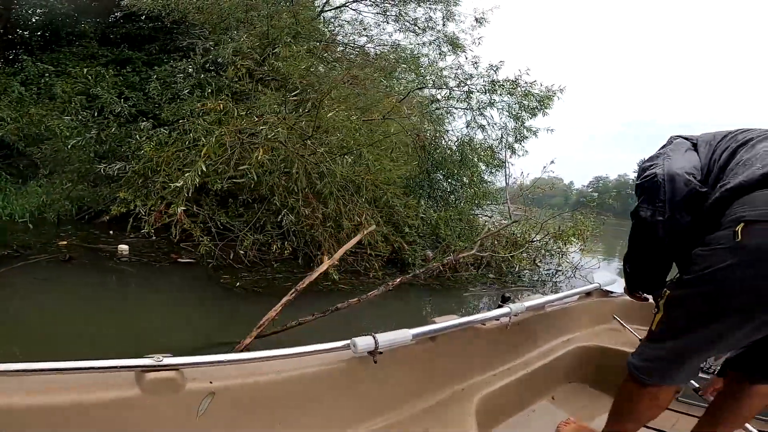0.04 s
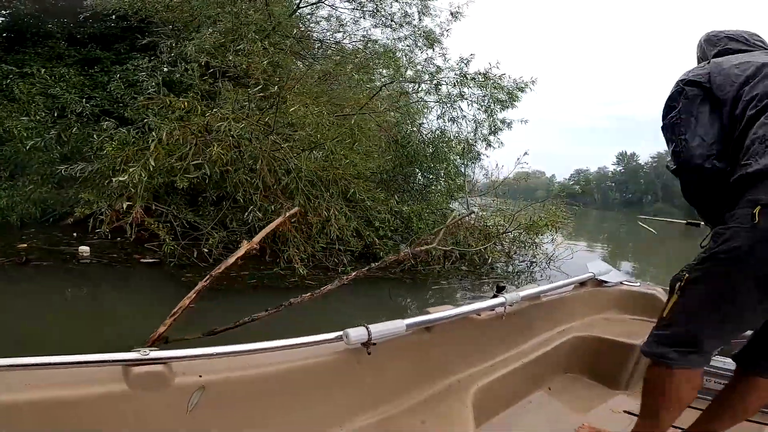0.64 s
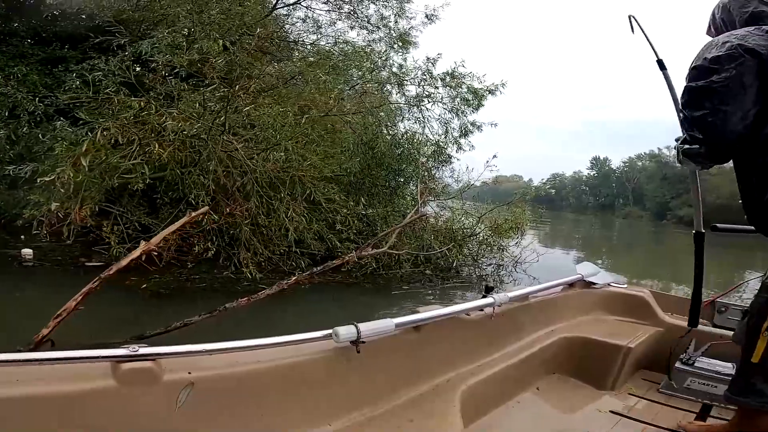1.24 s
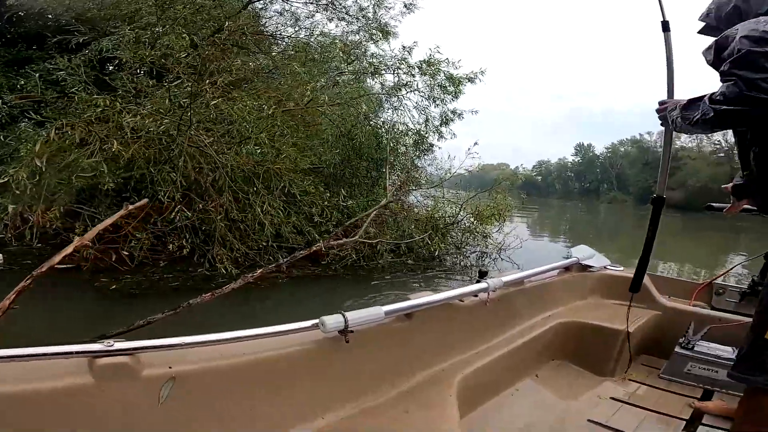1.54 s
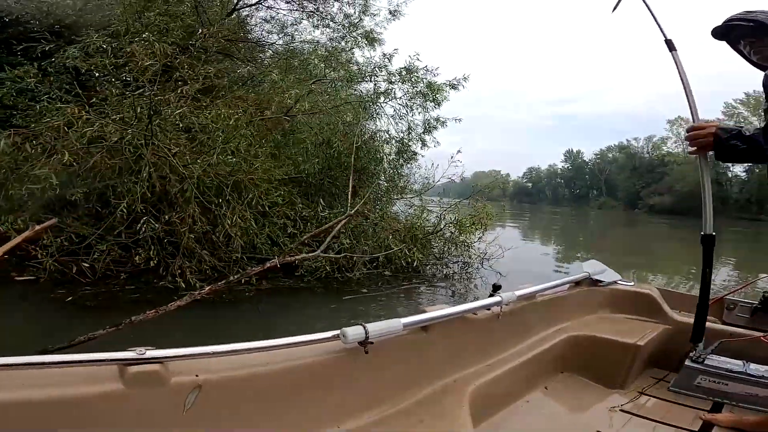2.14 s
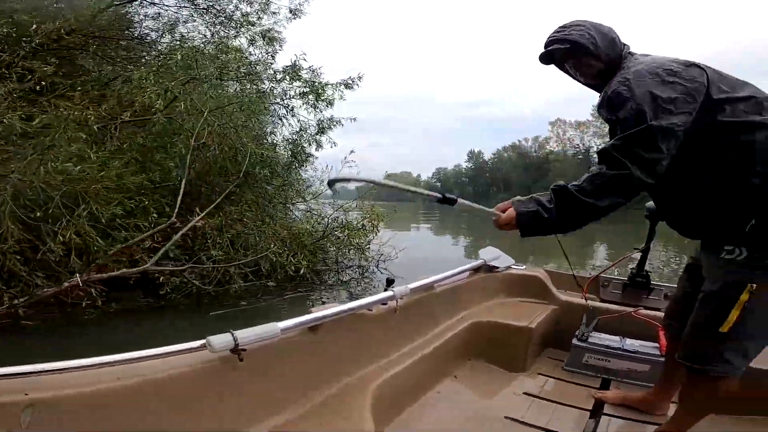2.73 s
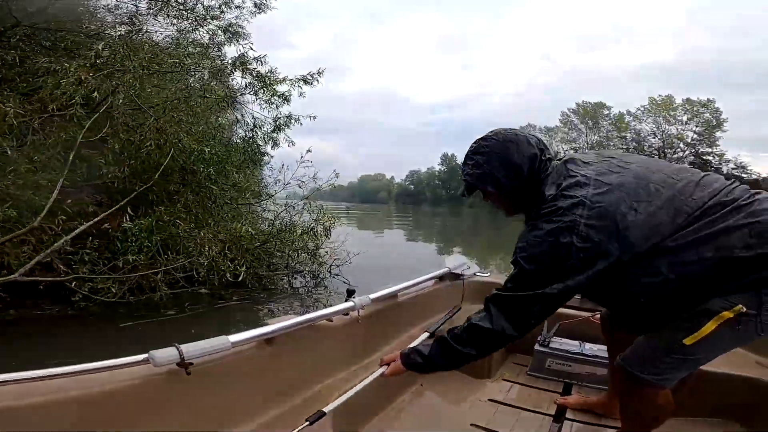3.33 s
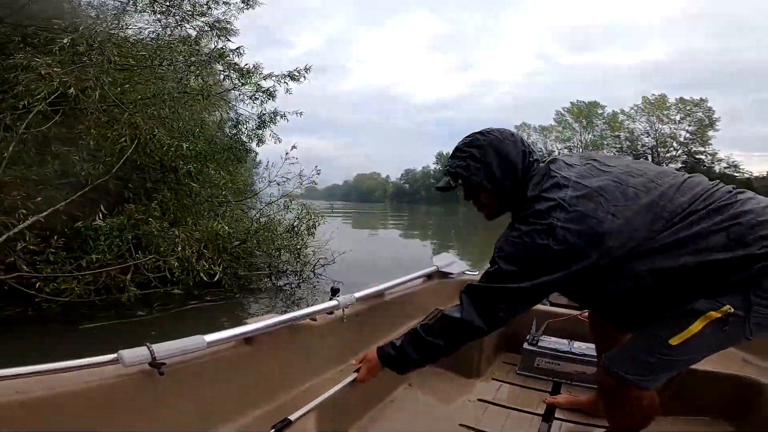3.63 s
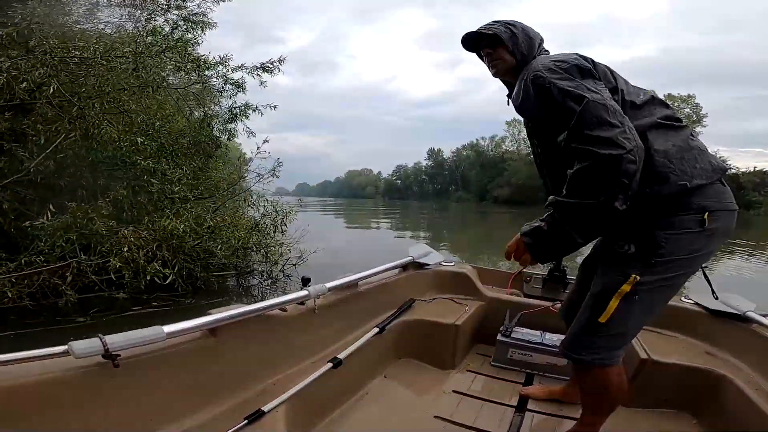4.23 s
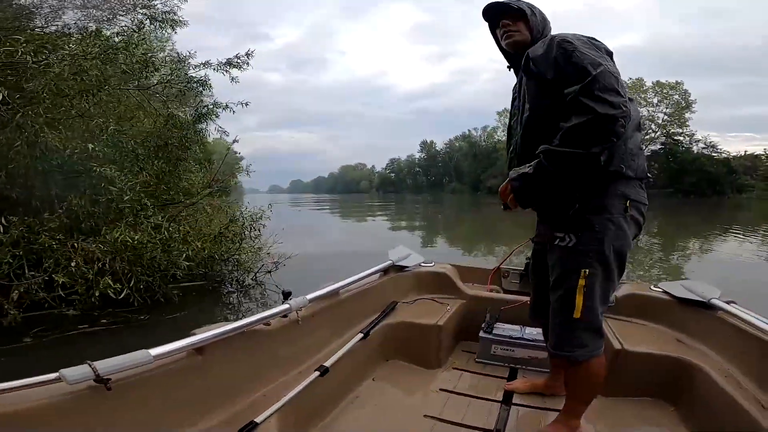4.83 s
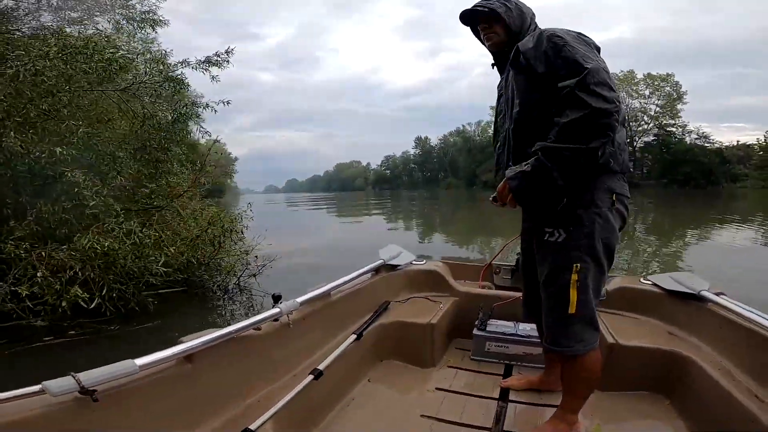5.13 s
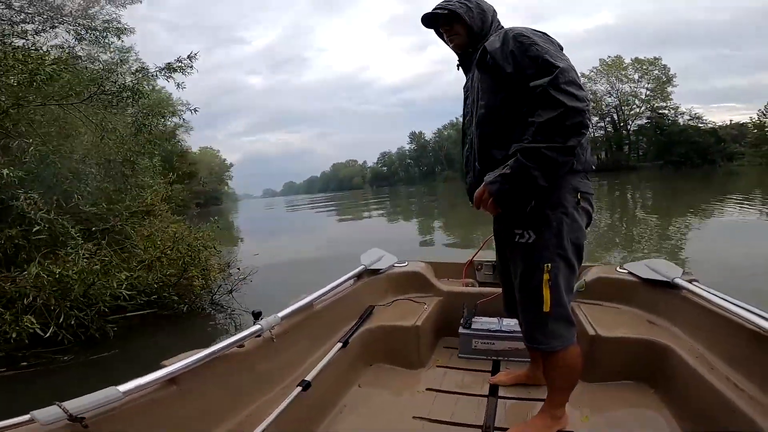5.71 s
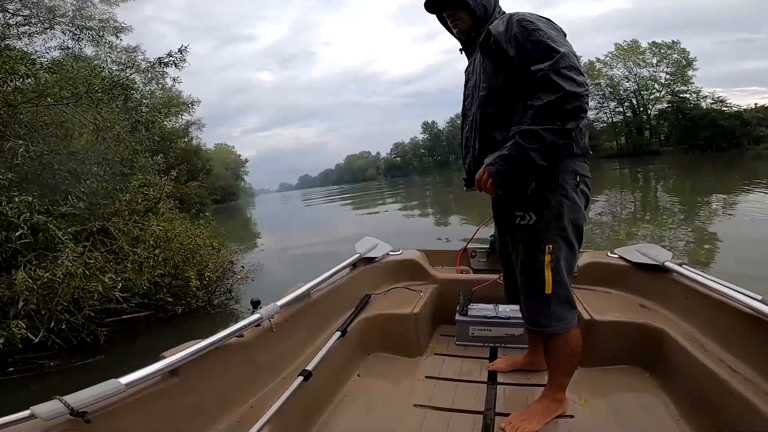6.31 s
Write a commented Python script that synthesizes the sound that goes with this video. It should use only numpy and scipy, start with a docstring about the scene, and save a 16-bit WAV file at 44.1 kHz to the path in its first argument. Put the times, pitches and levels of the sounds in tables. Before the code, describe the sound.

Gear booms, thumps and clatters on a hollow plastic boat hull, with small tackle clicks, jacket rustle and a low hum.

```python
"""Angler in a plastic boat

An angler in a rain jacket lays a long pole down in a small boat on a river and stands up again.
Gear booms, thumps and clatters on the hollow hull, hard enough to overload the microphone, and small
tackle clicks in his hands. Water plops, jacket and leaves rustle, and a breeze puffs at the right
microphone port. Underneath, a low hum gives way to the drone of the rocking hull."""
import sys
import numpy as np
from scipy import signal
from scipy.fft import rfft, irfft, next_fast_len
from scipy.io import wavfile

SR = 44100
rng = np.random.default_rng(int(sys.argv[2]) if len(sys.argv) > 2 else 0)


def wrap_up_sound(samples):
    """Save the sound to the file named by the first command line argument, as 16-bit audio."""
    columns = np.atleast_2d(samples).T
    # keep every value between -1 and 1, then stretch to whole-number steps
    tamed = np.clip(columns, -1, 1)
    steps = np.round(tamed * 32767).astype(np.int16)
    wavfile.write(sys.argv[1], SR, steps)


N = 285018
TIME = np.arange(N) / SR
EDGES = 22 * 2 ** (np.arange(20) / 2)   # half-octave band edges [Hz]
CENTRES = np.sqrt(EDGES[1:] * EDGES[:-1])

# Gear hitting the hull: (time [s], boom level [dB], boom centre [Hz], share of free ring time [ratio],
# thump level [dB], thump pitch [Hz], thump swell [s], knock level [dB], leading wall mode [Hz],
# crack level [dB], echo send [dB])
BLOWS = [ (0.639, -22.5, 330, 0.69, -8.5, 123, 0.011, -15, 1330, -10.5, 6),
         (0.657, -22.5, 245, 0.63, -13, 180.6, 0.02, -38, 960, -28.5, -3),
         (1.473, -20.5, 160, 0.86, -4, 157.5, 0.014, -18.5, 1090, -23.5, -2),
         (1.477, -17.5, 250, 1.02, -1.5, 261, 0.013, -12, 1130, -12.5, 1),
         (2.295, -40, 150, 0.6, -23, 150, 0.0094, -28.5, 492, -38.5, 5),
         (2.537, -38.5, 302, 0.5, -30, 174, 0.0073, -36.5, 500, -30, -3),
         (2.981, -52, 199, 0.86, -49, 199, 0.006, -36, 1290, -38.5, -3),
         (3.218, -12, 328, 1.06, 2.5, 122, 0.011, -8.5, 990, -24.5, -5),
         (3.246, -13, 206, 1.2, -2, 154.5, 0.014, -28.5, 896, -15.5, -2),
         (3.258, -18.5, 98, 0.79, -7, 98, 0.024, -38, 1108, -35, -5),
         (3.335, -25, 90, 0.35, -6.5, 115, 0.0066, -60, 1100, -58, -3),
         (3.36, -26.5, 149, 0.39, -9.5, 78.5, 0.017, -58, 1100, -60, -3),
         (3.389, -30, 130, 0.55, -21, 138, 0.0097, -32, 795, -35, 1),
         (3.519, -11.5, 300, 1.15, 3, 162, 0.016, -11.5, 1265, -16, -2),
         (3.56, -23, 150, 0.91, -10.5, 125.6, 0.021, -40, 524, -51, 0),
         (3.603, -21, 135, 0.72, -3, 143, 0.0094, -44, 608, -56, 0),
         (3.621, -19, 138, 0.55, -19, 138, 0.0097, -28, 1270, -44, 0),
         (3.649, -12, 250, 0.88, 0, 123, 0.012, -17.5, 850, -29, -3),
         (3.669, -8.5, 83, 0.76, -1, 184.3, 0.017, -12.5, 1216, -26, -10),
         (3.703, -12, 198, 0.75, -2.5, 103, 0.019, -37, 586, -31, 0),
         (3.745, -12, 168, 0.77, -5, 332, 0.01, -19, 800, -27.5, -5),
         (3.769, -17, 220, 0.75, -23, 201, 0.0063, -25, 1350, -25, -12),
         (3.784, -22.5, 90, 0.66, -6, 139, 0.0042, -46, 621, -55, -3),
         (3.807, -19, 132, 1, -19, 166, 0.0096, -40, 920, -41, 0),
         (3.833, -19.5, 157, 1.5, -14, 169, 0.009, -32, 920, -42, -3),
         (3.862, -26.5, 250, 1.3, -6.5, 101, 0.013, -21, 2470, -8, -0.5),
         (3.913, -25.5, 200, 0.8, -21, 107, 0.01, -35, 1300, -30, 13),
         (3.955, -30.5, 260, 0.96, -18, 110.4, 0.022, -50, 1100, -50, 0), ]


def from_db(db):
    """Decibels to gain."""
    return 10 ** (np.asarray(db) / 20)


def rms_one(x):
    """Scale to unit power."""
    return x / np.sqrt(np.mean(x ** 2) + 1e-20)


def in_time(points):
    """Read a (time, value) curve at every sample."""
    return np.interp(TIME, *np.transpose(points))


def at_hz(points, hz):
    """Read a (frequency, value) curve on a log-frequency axis."""
    freqs, values = np.transpose(points)
    return np.interp(np.log(hz), np.log(freqs), values)


def decay(t, t60):
    """An envelope that loses 60 dB in t60 seconds."""
    return np.exp(-np.log(1000) * t / t60)


def drift(per_s):
    """A random wander with a spread of about one and per_s new values a second."""
    knots = rng.standard_normal(1024)
    return np.interp(TIME * per_s, np.arange(len(knots)), knots)


def add(track, start_s, sound):
    """Mix a sound into a track from start_s on."""
    start = int(start_s * SR)
    track[..., start:start + sound.shape[-1]] += sound[..., :N - start]


def filtered(x, kind, hz, order=2):
    """Butterworth filter."""
    return signal.sosfilt(signal.butter(order, hz, kind, fs=SR, output="sos"), x)


def tone(hz):
    """A sine of unit power that follows a pitch curve."""
    return np.sqrt(2) * np.sin(2 * np.pi * np.cumsum(hz) / SR)


def mode(hz, level_db, t60):
    """One struck resonance, swinging up within a cycle."""
    t = TIME[:SR // 4]
    return from_db(level_db) * np.sin(2 * np.pi * hz * t) * decay(t, t60) * (1 - np.exp(-2 * hz * t))


def glides(rows, wobble, rough_db):
    """Short unsteady tones that swell, fade and glide in pitch."""
    out, t = np.zeros(N), TIME[:SR // 3]
    unsteady = 1 + wobble * drift(130)
    for start, level_db, hz, length, octaves_per_s in rows:
        age = 2 * t / length
        pitch = hz * 2 ** (octaves_per_s * t) * unsteady[int(start * SR):][:len(t)]
        add(out, start, from_db(level_db) * age * np.exp(1 - age) * tone(pitch))
    return out * from_db(rough_db * drift(76))


def noise_bands(likeness):
    """Half-octave stereo noises of unit power, each with its own width: bands x 2 x N."""
    white, bands = rng.standard_normal((2, 2, N)), []
    for k, hz in enumerate(CENTRES):
        mid, side = filtered(white[k % 2], "band", EDGES[k:k + 2])
        alike = np.clip(at_hz(likeness, hz), 0, 1)
        bands.append(rms_one(np.sqrt(1 + alike) * mid + np.sqrt(1 - alike) * side * [[1], [-1]]))
    return np.array(bands, dtype=np.float32)


def burst(bands, start_s, band_db, t60, snap):
    """Crowded modes struck at once: a snap at the contact, then noise that dies away band by band."""
    start = int(start_s * SR)
    noise = bands[:, :, start:start + SR // 5]
    t = TIME[:noise.shape[-1]]
    attack = 1 - np.exp(-2 * np.pi * CENTRES[:, None] * t)   # each band swings up within a cycle
    envelope = from_db(band_db)[:, None] * decay(t, t60[:, None]) * attack
    return np.einsum("bcn,bn->cn", noise, envelope) * (1 + snap * decay(t, t60=0.0098))


def wash(bands, spectrum, flicker_db, flicker_per_s):
    """A noise bed of unit power whose bands flicker independently."""
    gains = from_db(at_hz(spectrum, CENTRES)) * np.sqrt(CENTRES)   # wider bands carry more power
    flickering = (gain * from_db(flicker_db * drift(flicker_per_s)) for gain in gains)
    return rms_one(sum(band * gain for band, gain in zip(bands, flickering)))


def hum(hum_hz=175.4, octave_db=-49.5, stop_s=5.0, fade_db_per_s=42, thrum_hz=49.9, thrum_db=-40.5):
    """A wavering hum with its octave, perhaps an electric motor, dies away late; a deep thrum goes on."""
    # Fundamental ahead of the fade-out: (time [s], level [dB])
    hum_levels = [(0, -44), (1.3, -41.5), (2.1, -39), (2.65, -32), (3.15, -31), (4.2, -39.5), (4.9, -36.5)]
    pitch = hum_hz * (1 + 0.0049 * drift(11))
    fade = from_db(-fade_db_per_s * np.maximum(TIME - stop_s, 0))
    partials = from_db(in_time(hum_levels)) * tone(pitch) + from_db(octave_db) * tone(2 * pitch)
    thrum = from_db(thrum_db) * tone(thrum_hz * (1 + 0.0159 * drift(4.36)))
    flutter = from_db(1.5 * drift(18))
    return (fade * partials + thrum) * flutter


def hull_drone(rock_hz=1.9, crest_s=6.3, bend_depth=0.054, attack_s=0.023, release_s=0.055):
    """Low notes of the hull swell, hold and fade, their pitch bending as the boat rocks."""
    # Notes of the rocking hull: (start [s], release start [s], centre pitch [Hz], level [dB])
    notes = [(2.46, 2.7, 72, -29.5), (5.15, 5.23, 130, -29), (5.68, 5.79, 112, -21.5),
             (5.88, 6.36, 112, -22), (5.74, 5.82, 72, -21), (5.86, 6.05, 82, -28), (6.1, 6.42, 78, -24),
             (5.95, 6.2, 145, -27.5)]
    out = np.zeros(N)
    bend = 1 + bend_depth * np.cos(2 * np.pi * rock_hz * (TIME - crest_s))
    for start, end, hz, level_db in notes:
        envelope = np.clip(np.minimum((TIME - start) / attack_s, 1 - (TIME - end) / release_s), 0, 1)
        pitch = hz * bend * (1 + 0.0248 * drift(45))
        rough_gain = from_db(level_db + 3.0 * drift(45))
        out += envelope * rough_gain * (tone(pitch) + from_db(-22.5) * tone(2 * pitch))
    return out


def breeze(bands, puff_hz=212.8, puff_s=0.036, puff_octaves_per_s=1.5, left_db=-15.0):
    """Wind buffets the microphone with lumpy low noise and puffs, almost all in the right port."""
    # Wind bed under the puffs: (time [s], level [dB])
    bed_levels = [(0, -76), (2.7, -37.5), (4.15, -33.5), (4.35, -22.5), (4.62, -29), (4.78, -24.5),
                  (5.0, -36), (5.35, -39), (5.5, -28), (6.46, -50)]
    # Colour of the buffeting: (frequency [Hz], relative density [dB])
    spectrum = [(70, -27), (140, 4), (210, 8), (300, -31), (420, -33), (800, -22.5), (2000, -29.5),
                (8000, -67), (16000, -68)]
    # Strongest puffs: (time [s], level [dB])
    puff_hits = [(4.522, -20.5), (4.705, -24), (4.88, -20.5), (5.066, -13), (5.18, -21), (5.607, -20.5),
                 (5.93, -19.5)]
    level = from_db(in_time(bed_levels) + 2.0 * drift(30))
    lumps = level * wash(bands[:, :1], spectrum, flicker_db=2.5, flicker_per_s=25)
    puffs = [(start, level_db, puff_hz, puff_s, puff_octaves_per_s) for start, level_db in puff_hits]
    return (lumps + glides(puffs, wobble=0.079, rough_db=2.5)) * from_db([[left_db], [0]])


def rustle(bands, crinkles_per_s=22, crinkle_db=-2.5, crinkle_t60=0.0091):
    """Jacket cloth and leaves: a grainy hiss that follows the movement and crinkles as folds give way."""
    # Movement of the cloth: (time [s], level [dB])
    movement = [(0, -44.5), (.25, -51), (.36, -41.5), (1.1, -43.5), (1.45, -37.5), (1.8, -47.5),
                (2.12, -47.5), (2.5, -39), (2.68, -44.5), (3.12, -36), (3.8, -51.5), (3.95, -41),
                (5.1, -45), (5.33, -54.5), (5.58, -36), (5.76, -52), (6.02, -42), (6.2, -51.5), (6.4, -33)]
    # Colour of the cloth: (frequency [Hz], relative density [dB])
    spectrum = [(200, 10), (500, 3), (800, -2), (1400, 6.5), (2500, -1), (4000, 1.5), (5500, -7.5),
                (7300, -9), (9000, -20), (13000, -28.5), (16000, -42)]
    # Pan of the rustle: (time [s], left over right [dB])
    pan = [(0, 1), (3.9, 0.5), (4.4, 0), (4.9, 1.5), (5.35, 5.5), (6.1, 2.5), (6.4, 4)]
    level = from_db(in_time(movement) + 0.96 * drift(45) + 1.3 * drift(150))
    folds = (rng.random(N) < crinkles_per_s / SR) * np.minimum(rng.exponential(1, N), 3)
    crinkles = from_db(crinkle_db) * signal.fftconvolve(folds, decay(TIME[:SR // 20], crinkle_t60))[:N]
    hiss = wash(bands, spectrum, flicker_db=1.3, flicker_per_s=28)
    return level * (1 + crinkles) * hiss * from_db(in_time(pan) * [[.5], [-.5]])


def water(bands, splash_db=-8, skirt_db_per_octave=14, splash_t60=0.14):
    """The river stirs against the hull and plops: a soft splash around a small gliding bubble."""
    # Water stirring against the boat: (time [s], level [dB])
    swell = [(0, -26), (1.85, -31.5), (2.45, -28), (2.9, -29), (4.5, -36.5), (5.2, -28), (6.0, -25),
             (6.46, -31.5)]
    # Colour of the river: (frequency [Hz], relative density [dB])
    spectrum = [(25, 0.5), (45, 8.5), (75, 3.5), (120, 3.5), (170, -6.5), (230, -7), (320, -18.5),
                (450, -31.5), (750, -54), (1500, -33.5), (4000, -40), (7300, -43), (10000, -87),
                (16000, -44)]
    # Bubbles beside the hull: (time [s], level [dB], starting pitch [Hz], length [s], rise [octaves/s])
    plops = [(0.08, -25, 140, 0.044, 0.6), (0.165, -25, 161, 0.04, 2), (0.155, -39.5, 472, 0.017, 5.5),
             (0.28, -46, 588, 0.029, 3.5), (0.0028, -45, 600, 0.017, -5), (0.148, -47, 990, 0.007, 2),
             (0.226, -47, 1070, 0.024, 5.5), (1.402, -24.5, 557, 0.012, -2), (1.422, -33.5, 525, 0.027, -1),
             (2.77, -43, 786, 0.015, 2)]
    stir = from_db(in_time(swell)) * wash(bands, spectrum, flicker_db=3.5, flicker_per_s=9.8)
    out = filtered(stir, "high", 36, order=4) + glides(plops, wobble=0.018, rough_db=3.0)
    for start, level_db, hz, *_ in plops:
        band_db = level_db + splash_db - skirt_db_per_octave * np.abs(np.log2(CENTRES / hz))
        add(out, start, burst(bands, start, band_db, np.full(len(CENTRES), splash_t60), snap=0))
    return out


def scrapes(grain_db=1.5, grains_per_s=170, width=0.3):
    """Pole, gear and sleeves slide: bands of grainy friction noise that swell and fade."""
    # Slides and one thin squeak: (start [s], length [s], level [dB], low edge [Hz], high edge [Hz])
    slides = [(0.321, 0.07, -35.5, 330, 1400), (1.385, 0.036, -37, 950, 1350),
              (2.31, 0.16, -40.5, 1290, 2270), (3.42, 0.045, -46, 14600, 15300),
              (3.646, 0.075, -26, 400, 1100), (5.072, 0.077, -44, 380, 900), (5.439, 0.25, -47, 350, 2000),
              (6.351, 0.17, -39.5, 500, 1300)]
    out, t = np.zeros((2, N)), TIME[:SR // 2]
    grain = from_db(grain_db * drift(grains_per_s))
    for start, length, level_db, low_hz, high_hz in slides:
        mid, side = rng.standard_normal((2, len(t)))
        friction = rms_one(filtered(mid + width * side * [[1], [-1]], "band", [low_hz, high_hz + 1]))
        envelope = np.sin(np.pi * np.minimum(t / length, 1))
        add(out, start, from_db(level_db) * friction * envelope)
    return out * grain


def tackle(bands, slip_s=0.0045, slip_db=-8, decay_cycles=190, flat_octaves=0.67, gain_db=-4.0):
    """Light contacts of pole and tackle: a short slip, a bright tick, then the struck part rings."""
    # Contacts: (time [s], tick level [dB], centre [Hz], treble floor relative to the centre [dB],
    # ring pitch [Hz], ring level [dB], ring t60 [s])
    ticks = [ (0.326, -32, 1800, -35, 1170, -39, 0.086), (0.346, -30.5, 2050, -33, 1310, -44, 0.055),
             (1.354, -12, 3040, -14.5, 1907, -11.5, 0.084), (1.366, -18.5, 2520, -19, 1114, -25.5, 0.12),
             (1.687, -41, 3270, -28, 4350, -48, .04), (2.245, -38, 3700, -24, 3300, -51, .03),
             (2.297, -30.5, 1650, -31, 478, -20.5, 0.062), (2.32, -46, 1840, -32, 1300, -42, .04),
             (2.536, -19.5, 3130, -30, 3130, -14, 0.035), (2.984, -51, 1800, -32, 1292, -29, 0.085),
             (3.246, -28.5, 7200, -7, 7550, -29, 0.06), (3.257, -25.5, 5500, -11, 6350, -36.5, 0.24),
             (3.444, -33, 2420, -30, 3400, -36, .03), (3.456, -26, 1900, -41, 4500, -27, 0.046),
             (3.472, -27, 2500, -34, 2660, -16, 0.031), (3.499, -30, 2390, -34, 7600, -41, .08),
             (3.630, -25, 2880, -28, 5270, -24, .04), (3.652, -30, 3080, -48, 4460, -24, .035),
             (3.671, -33, 3960, -48, 7700, -30, 0.072), (3.678, -38, 3360, -48, 4150, -27, .03),
             (3.707, -57, 3600, -32, 4430, -34, .04), (3.757, -42, 3800, -28, 4670, -31, .04),
             (3.769, -43, 4170, -36, 7480, -31, 0.027), (4.05, -30, 2540, -30, 1950, -35, 0.045),
             (4.185, -38, 2120, -30, 1440, -54, .05), (4.238, -40, 2130, -32, 1480, -53, .05),
             (4.981, -26.5, 2750, -20, 2750, -28, 0.035), (5.029, -38.5, 2590, -25, 1900, -42, .03),
             (5.066, -29, 2750, -14, 3980, -22, 0.031), (5.549, -29, 3060, -12, 2620, -39, .04),
             (5.605, -24.5, 3040, -17, 2620, -21, 0.034), (5.645, -41.5, 2120, -33, 2140, -34, .03),
             (5.68, -46, 2700, -30, 2720, -33, .04), (5.948, -52, 5960, -26, 5270, -24, 0.03),
             (6.033, -26.5, 3100, -16, 2090, -30, 0.044), (6.109, -23.5, 3100, -21, 1940, -14, 0.017), ]
    out = np.zeros((2, N))
    for start, level_db, centre_hz, sparkle_db, ring_hz, ring_db, ring_t60 in ticks:
        octaves = np.log2(CENTRES / centre_hz)
        low_cut_db = 16.5 * np.maximum(-octaves - flat_octaves, 0) ** 1.15
        high_cut_db = 21.0 * np.maximum(octaves - flat_octaves, 0) ** 1.37
        high_cut_db = np.minimum(high_cut_db, -sparkle_db)   # hard edges keep some sparkle
        band_db = level_db + gain_db - low_cut_db - high_cut_db
        t60 = np.full(len(CENTRES), decay_cycles / centre_hz)
        slip = burst(bands, start - slip_s, band_db + slip_db, t60, snap=0)
        add(out, start - slip_s, slip * np.minimum(TIME[:slip.shape[-1]] / slip_s, 1))
        add(out, start, burst(bands, start, band_db, t60, snap=1.3))
        add(out, start, mode(ring_hz, ring_db, ring_t60))
    return out


def bank_echo(bands, band_db, swell_s=0.07, t60=0.39, dull_hz=1200, db_per_octave=4.0, gain_db=-13.0):
    """The bushes on the bank scatter a blow into an even, dull tail."""
    t, start = TIME[:SR // 2], rng.integers(N - SR)
    gains = from_db(band_db + gain_db - db_per_octave * np.maximum(np.log2(CENTRES / dull_hz), 0))
    tail = np.einsum("b,bcn->cn", gains, bands[:, :, start:start + len(t)])
    return tail * decay(t, t60) * np.minimum(t / swell_s, 1) ** 2


def panel_colour(contacts):
    """Wall panels and pole colour the contacts and ring on a little."""
    # Peaks and dips of panels and pole: (frequency [Hz], width [Hz], gain [dB])
    resonances = [(406, 20, 4.5), (486.4, 11.5, 6.5), (607.4, 13, 5.5), (725, 60, -2.5), (855, 7.3, 2.5),
                  (952, 19, 4), (1108, 50, 5.5), (1300, 64, 4), (1463, 33, 4.5), (1900, 30, 3.5),
                  (2470, 42, -0.5), (3090, 67, -1), (3540, 260, -3), (4330, 170, 2.5)]
    out = contacts.copy()
    for hz, width_hz, gain_db in resonances:
        ring = signal.lfilter(*signal.iirpeak(hz, hz / width_hz, fs=SR), contacts)
        out += (from_db(gain_db) - 1) * ring
    return out


def panel_thumps(sharpness=2.32):
    """The struck panel swings up into one short hollow note and is damped by the gear lying on it."""
    out, t = np.zeros(N), TIME[:SR // 5]
    for start, _, _, _, thump_db, hz, swell_s, *_ in BLOWS:
        age = t / swell_s
        envelope = (age * np.exp(1 - age)) ** sharpness
        add(out, start, from_db(thump_db) * envelope * np.sin(2 * np.pi * hz * t))
    return out


def hull_boom(scatter_db=2.0, swell_s=0.0021, reach_octaves=0.39, far_share=0.2):
    """Each blow or step swings the low modes; where and how softly it lands decides which ones lead."""
    # Low modes of the hollow hull: (frequency [Hz], relative level [dB], free t60 [s])
    hull_modes = [(46.3, 1.5, 0.97), (70.05, 5, 0.74), (91.6, -9, 0.8), (107.6, -1, 1), (129.5, 4, 0.75),
                  (157.3, 4, 0.44), (173.2, -1.5, 0.46), (213.2, -0.5, 0.32), (234.9, 1, 0.36),
                  (266.5, 2.5, 0.4), (311.7, 6.5, 0.16), (343.2, 7, 0.21), (402.4, 10, 0.13),
                  (496, -2.5, 0.2), (607, 1, 0.12)]
    # Bare feet landing on the floor and damping it:
    # (time [s], level [dB], boom centre [Hz], share of free ring time [ratio])
    footfalls = [(2.262, -27, 60, 0.29), (2.295, -24, 53.3, 0.12), (5.611, -24.5, 65.5, 0.42)]
    out, t = np.zeros(N), TIME[:SR * 2 // 3]
    hz, mode_db, t60 = np.transpose(hull_modes)
    polarity = (-1) ** np.arange(len(hz))
    attack = 1 - np.exp(-t / swell_s)   # bending waves take time to spread
    swings = np.sin(2 * np.pi * hz[:, None] * t) * attack
    for start, boom_db, centre_hz, ring_share, *_ in BLOWS + footfalls:
        weights = polarity * from_db(mode_db + scatter_db * rng.standard_normal(len(hz)))
        excitation = far_share + np.exp(-.5 * (np.log2(hz / centre_hz) / reach_octaves) ** 2)
        ring = (weights * excitation) @ (swings * decay(t, ring_share * t60[:, None]))
        add(out, start, from_db(boom_db) * ring / np.std(ring[:SR // 20]))
    return out


def hull_clatter(bands, knock_hz=1050, crack_hz=3200, bass_db_per_octave=4.0, ring_doubling_db=35.5):
    """The walls knock, led by one mode, and crack under hard contacts; each blow echoes off the bank."""
    # Ring of the dense upper modes: (frequency [Hz], base t60 [s])
    wall_t60 = [(350, 0.35), (1000, 0.11), (2500, 0.063), (6000, 0.088), (14000, 0.025)]
    out = np.zeros((2, N))
    bass_cut_db = bass_db_per_octave * np.maximum(np.log2(knock_hz / CENTRES), 0)
    octaves_above = np.maximum(np.log2(CENTRES / crack_hz), 0)
    for start, *_, knock_db, lead_hz, crack_db, echo_db in BLOWS:
        colour = [(knock_hz, knock_db), (crack_hz, crack_db)]
        treble_db_per_octave = -9.5 + 0.27 * crack_db   # softer cracks are duller
        band_db = at_hz(colour, CENTRES) - bass_cut_db + treble_db_per_octave * octaves_above
        hardness_db = crack_db - knock_db   # a hard contact bounces off and lets the wall ring
        t60 = 0.96 * 2 ** (hardness_db / ring_doubling_db) * at_hz(wall_t60, CENTRES)
        add(out, start, burst(bands, start, band_db - 1.5, t60, snap=1.23))
        add(out, start, bank_echo(bands, band_db + echo_db))
        add(out, start, mode(lead_hz, at_hz(colour, lead_hz) - 1.0, t60=0.055))
    return filtered(out, "high", 300)


def left_port_lag(sound):
    """The boat lies to the right, so its sounds reach the left port a moment later."""
    # Lag at the left port: (frequency [Hz], phase shift [rad])
    phase = [(40, -0.35), (200, -0.06), (520, -0.6), (1500, -0.8), (3700, -0.67), (5200, -1.6),
             (6800, -0.67), (10000, -1.37), (16000, -3)]
    size = next_fast_len(N + SR // 10)
    hz = np.maximum(np.arange(size // 2 + 1) * SR / size, 1)
    left = irfft(rfft(sound[0], size) * np.exp(1j * at_hz(phase, hz)), size)[:N]
    return np.array([left, sound[1]])


def scene():
    """Gear on the hull in front of water, rustle, breeze, drone and hum."""
    # Stereo image of the close contacts: (frequency [Hz], left-right likeness [0-1])
    near_likeness = [(60, .99), (400, .94), (1200, .92), (3000, .84), (8000, .68)]
    # Stereo image of water and rustle: (frequency [Hz], left-right likeness [0-1])
    air_likeness = [(60, 1), (200, 0.93), (1000, 0.88), (3000, 0.49), (7000, 1), (14000, 0.1)]
    near, air = noise_bands(near_likeness), noise_bands(air_likeness)
    gear = panel_colour(hull_clatter(near) + tackle(near)) + hull_boom() + panel_thumps() + scrapes()
    river = water(air[..., ::-1])   # reversed noise keeps the water independent of the rustle
    return left_port_lag(gear + river + rustle(air) + breeze(near) + hull_drone() + hum())


def record(dry, ceiling=0.9, cutoff_hz=16000):
    """The loudest blows overload the microphone and flatten; a steep low-pass trims the top."""
    clipped = dry / (1 + (dry / ceiling) ** 8) ** (1 / 8)
    return signal.sosfilt(signal.ellip(10, .1, 80, cutoff_hz, fs=SR, output="sos"), clipped)


dry = scene()
out = record(dry)
wrap_up_sound(out)
```